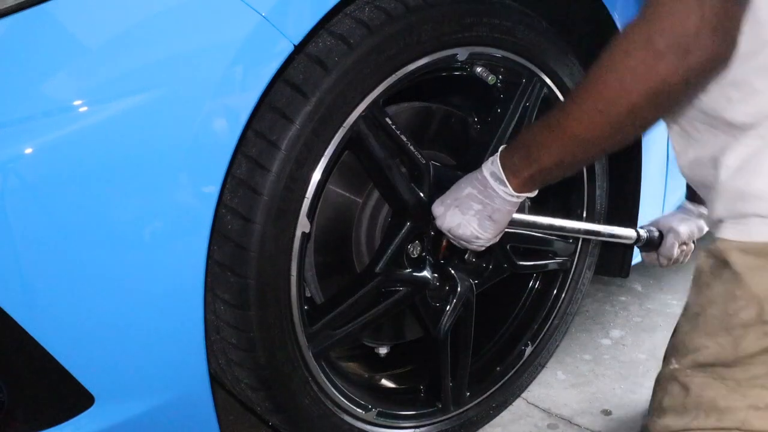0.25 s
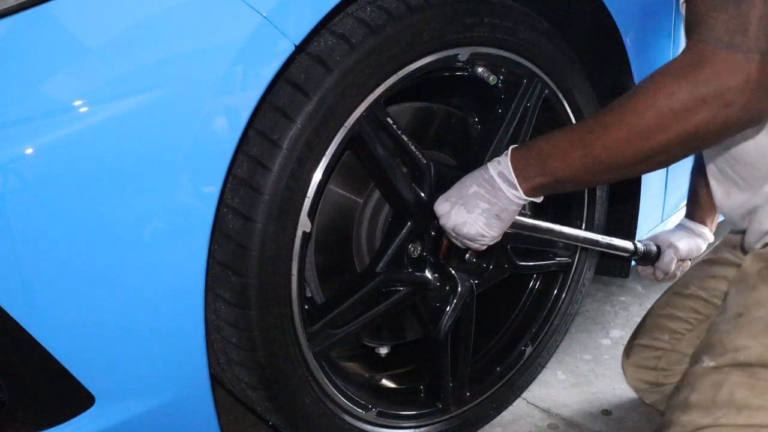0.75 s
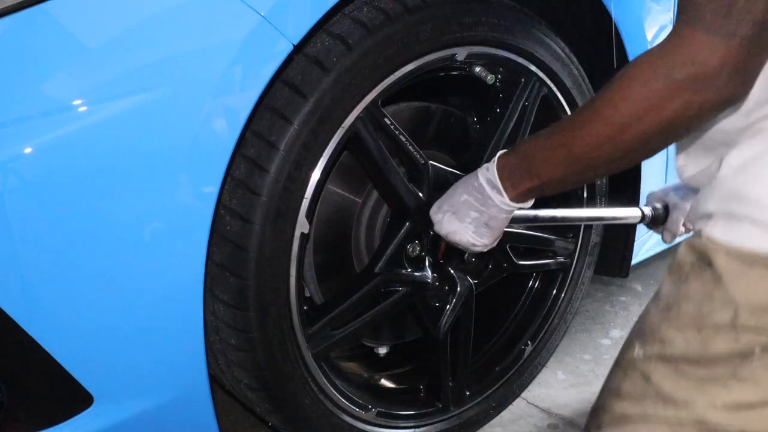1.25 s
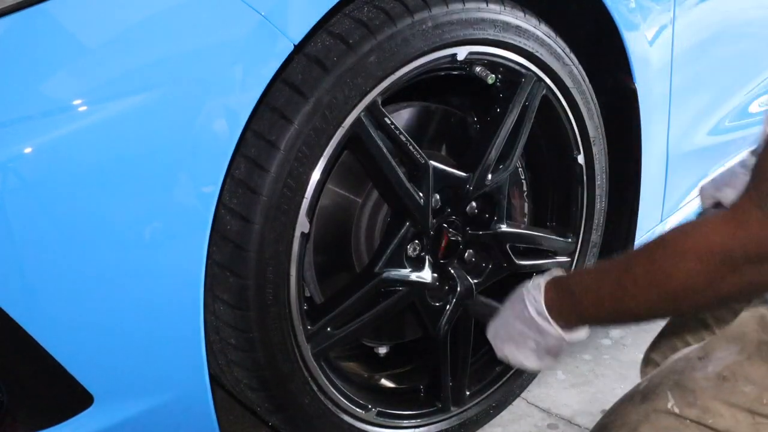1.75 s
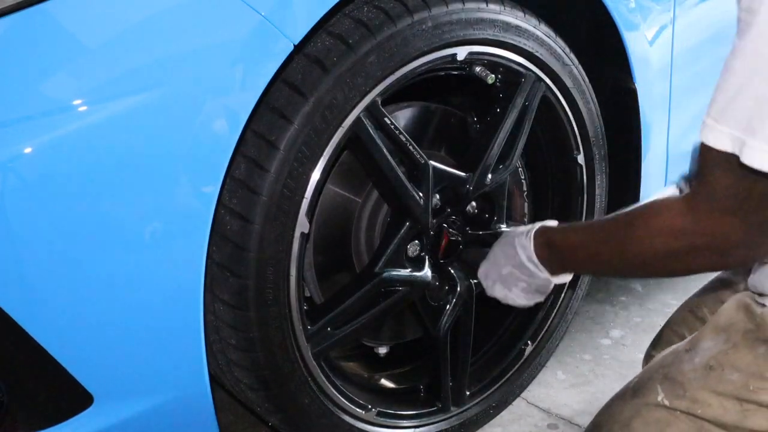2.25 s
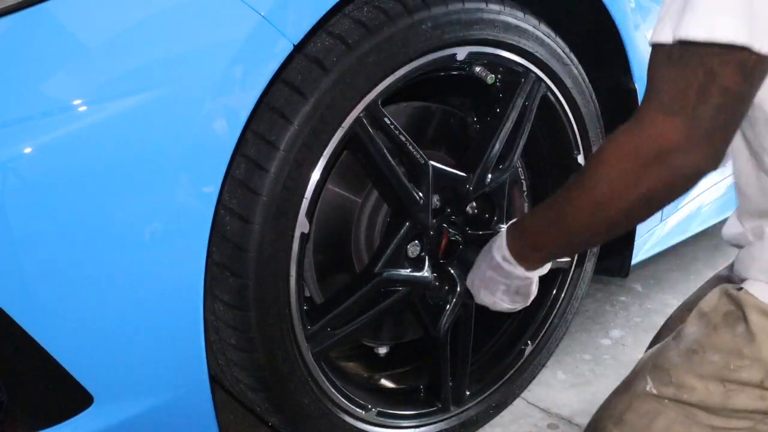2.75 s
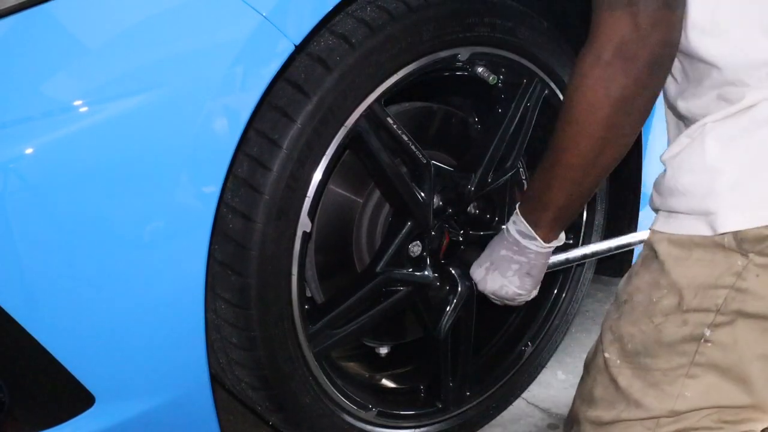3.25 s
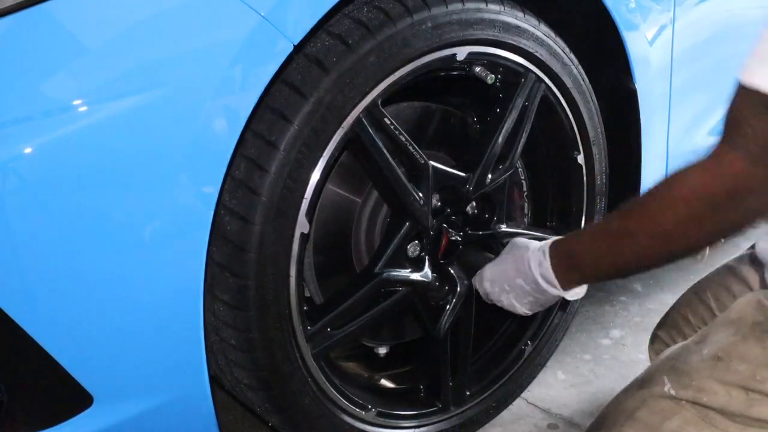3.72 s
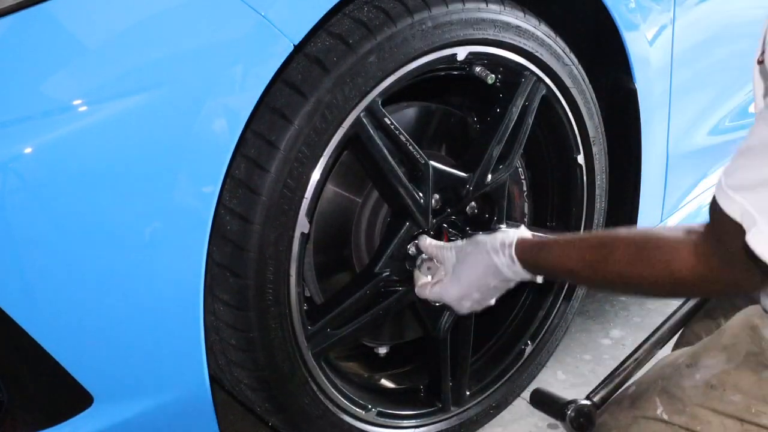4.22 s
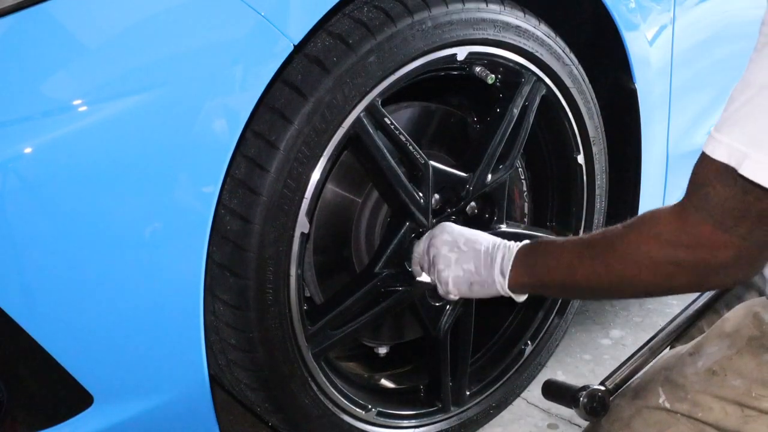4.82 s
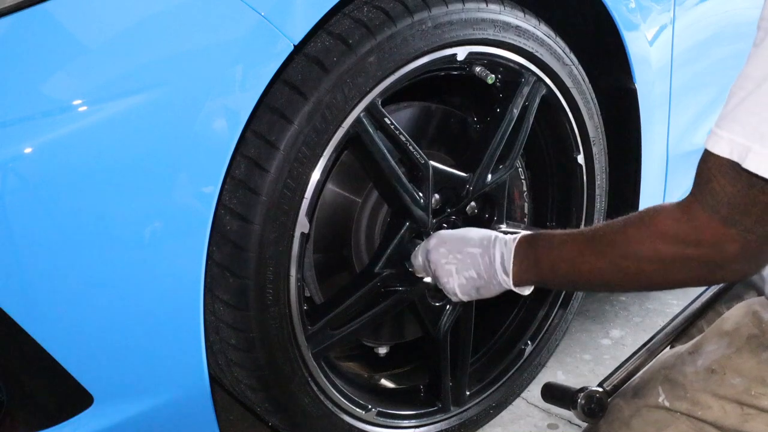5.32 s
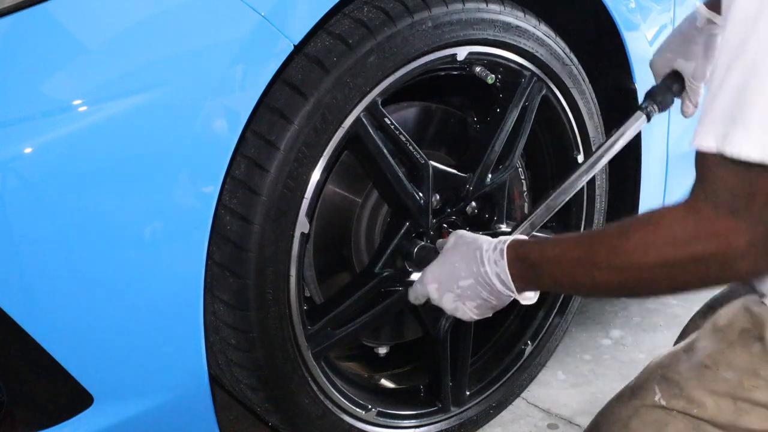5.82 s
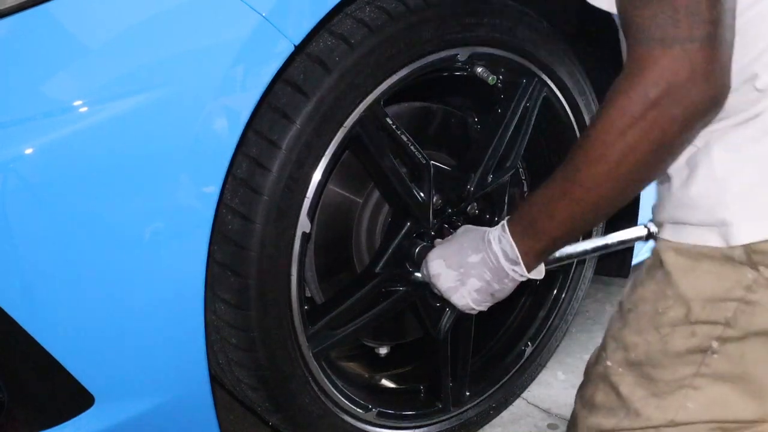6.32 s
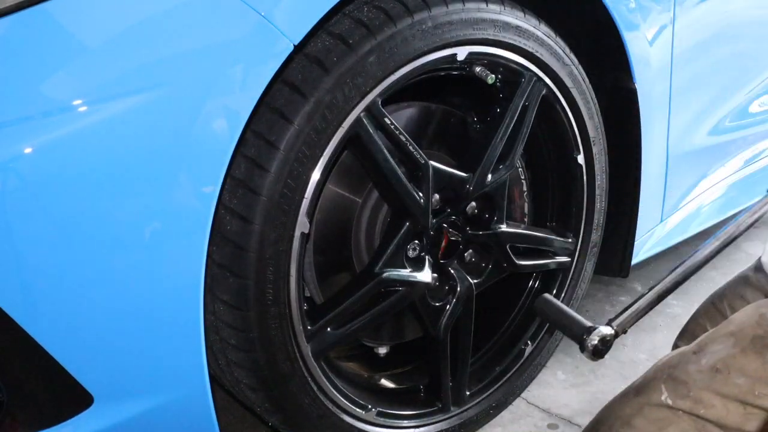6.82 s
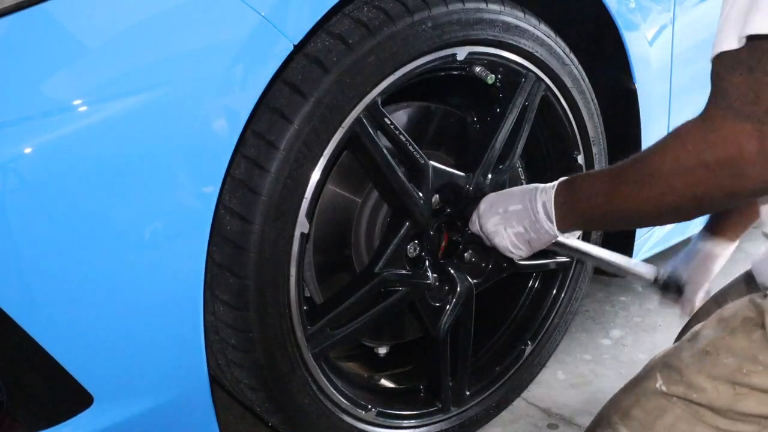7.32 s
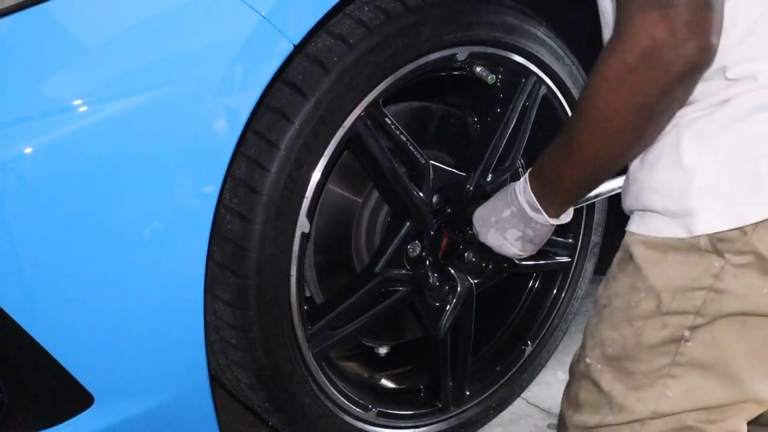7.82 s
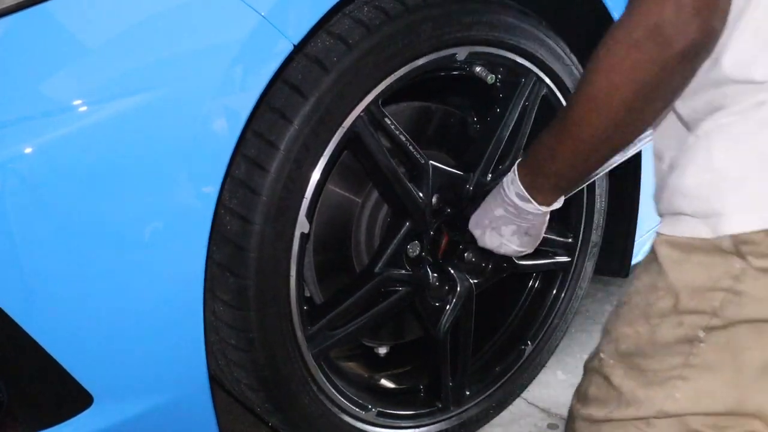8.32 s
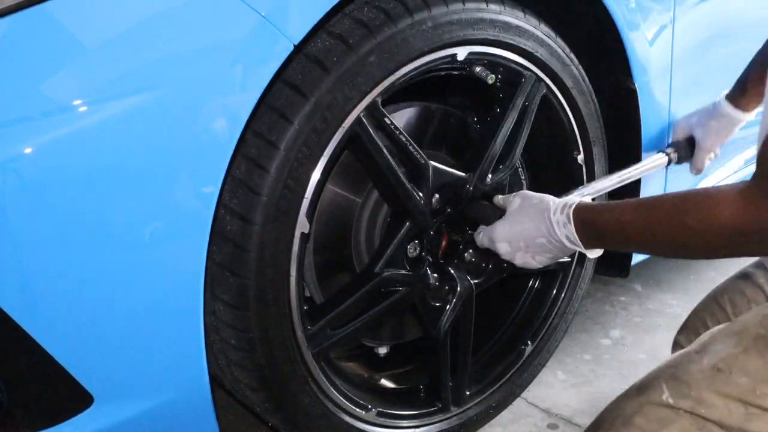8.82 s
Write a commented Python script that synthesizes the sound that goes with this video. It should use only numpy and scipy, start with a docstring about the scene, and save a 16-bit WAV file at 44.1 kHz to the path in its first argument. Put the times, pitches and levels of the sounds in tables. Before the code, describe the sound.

A torque wrench gives two loud metallic clicks in a garage, followed by socket clatter, short ratchet ticks and lighter clicks.

```python
"""Tightening wheel nuts

A click-type torque wrench tightens the lug nuts of a car wheel in a garage. It gives way with a sharp
click and snaps back with a second one. In between, the ratchet ticks, the socket clatters from nut to
nut, gloves rub and knees bump. A limiter holds down the two loudest clicks, so their echo hangs on."""
import sys
import numpy as np
from scipy import signal
from scipy.fft import rfft, irfft
from scipy.io import wavfile
from scipy.ndimage import uniform_filter1d, minimum_filter1d

SR = 44100
rng = np.random.default_rng(int(sys.argv[2]) if len(sys.argv) > 2 else 0)


def unload_audio(sound):
    """Save the sound as a 16-bit wav file, at the path given as the first command line argument."""
    columns = np.transpose(np.atleast_2d(sound))
    # keep every value between -1 and 1, then stretch to whole-number steps
    steps = np.round(np.clip(columns, -1, 1) * 32767)
    wavfile.write(sys.argv[1], SR, steps.astype(np.int16))


N = 399546
SIZE = 2 ** 15   # samples in one short sound
AGE, HZ = np.arange(SIZE) / SR, np.fft.rfftfreq(SIZE, 1 / SR)
LEAD_S = 0.08   # time for a sound to build up before its hit
CRACK_FADE_S = 0.02   # every fade_s is the time to fall by 60 dB


def from_db(db):
    """Turn decibels into a gain."""
    return 10 ** (np.asarray(db) / 20)


def decay(age, fade_s):
    """Fall by 60 dB in fade_s seconds."""
    return np.exp(-np.log(1000) * age / max(fade_s, 1e-3))


def swell(age, rise_s, hold_s, fade_s):
    """Build up until age 0, hold, then die away."""
    return decay(np.maximum(-age, 0), rise_s) * decay(np.maximum(age - hold_s, 0), fade_s)


def tone(points, hz=HZ):
    """Join (pitch_hz, level_db) points into a tone curve in dB."""
    pitch_hz, level_db = np.transpose(points)
    return np.interp(np.log(hz + 1), np.log(pitch_hz), level_db)


def resonances(peaks):
    """Peaks in dB where a part rings; narrow ones are limited in height, so they do not whistle."""
    return sum(min(boost_db, 4 + width_hz / 14) / (1 + (2 * (HZ - hz) / max(width_hz, 40)) ** 2)
               for hz, width_hz, boost_db in peaks)


def weak_resonances(spread_db):
    """Each touch stirs its own mix of the steel's many weak resonances, in dB."""
    grid_hz = np.arange(0, SR / 2, 40)
    return spread_db * np.interp(HZ, grid_hz, rng.standard_normal(len(grid_hz)))


def body(curve_db):
    """Turn a tone curve into a filter of standard power that rings only after a hit (minimum phase)."""
    cepstrum = irfft(curve_db * np.log(10) / 20)
    cepstrum[1:SIZE // 2] *= 2
    cepstrum[SIZE // 2 + 1:] = 0
    response = np.exp(rfft(cepstrum))
    return response / np.sqrt(np.mean(abs(response) ** 2 * (HZ < 12000)))


def direct(force, response, left_db=-1.3, left_lag_s=0.000032):
    """Sound straight from the wheel, a little to the listener's right."""
    spectrum = rfft(force) * response
    left = spectrum * from_db(left_db) * np.exp(-2j * np.pi * HZ * left_lag_s)
    right = spectrum * from_db(-left_db)
    return irfft(np.array([left, right]))


def diffuse(envelope, response, hz=HZ):
    """Reflections from all sides: left and right are alike in the bass, unrelated in the treble."""
    mid, side = rfft(rng.standard_normal((2, len(envelope))) * envelope) * response
    alike = 0.97 * np.sinc(hz * 0.00043)
    mid, side = mid * np.sqrt((1 + alike) / 2), side * np.sqrt((1 - alike) / 2)
    return irfft(np.array([mid + side, mid - side]), len(envelope))


def contacts(envelope, uneven_db):
    """Many tiny hits of uneven strength that together carry the envelope's energy."""
    grip = np.interp(np.arange(SIZE), np.arange(0, SIZE, 64), rng.standard_normal(SIZE // 64))
    force = rng.standard_normal(SIZE) * from_db(uneven_db * grip) * envelope
    return force * np.sqrt(np.sum(envelope ** 2) / np.sum(force ** 2))


def chatter(crack, rattle, curve_db, uneven_db, room_db):
    """Loose steel parts: a dry crack and an uneven rattle that spreads into the garage."""
    response = body(curve_db + weak_resonances(spread_db=3.0))
    room_gain = from_db(room_db)
    dry_share = 1 / np.sqrt(1 + room_gain ** 2)
    force = contacts(crack, uneven_db=0) + dry_share * contacts(rattle, uneven_db)
    return direct(force, response) + room_gain * dry_share * diffuse(rattle, response)


def add(out, start_s, sound):
    """Mix in a short stereo sound and fade out its end."""
    start = max(round(start_s * SR), 0)
    fade = np.minimum((AGE[-1] - AGE) / 0.1, 1) ** 2
    out[:, start:start + SIZE] += (sound * fade)[:, :N - start]


# how loud the garage is: time_s, rumble_db, hiss_db
AIR_LEVELS = [(0, -54, -46.5), (0.699, -53.5, -50.5), (2.051, -53.5, -51.5), (2.55, -60.5, -58.5),
              (9.06, -62.5, -57.5)]
# tone of the rumble and of the hiss: pitch_hz, level_db
RUMBLE_TONE = [(12, -40), (20, -16.5), (75, 5), (124, 8), (151, 3.5), (263, 2.5), (386, -31), (464, -3.5),
               (506, -28), (600, -19.5), (780, -49.5), (1320, -120)]
HISS_TONE = [(180, -13), (300, -2.5), (510, -4.5), (937, -5), (1030, -5), (1280, -5.5), (2180, -7.5),
             (6700, -19.5), (10900, -29.5), (11900, -37), (12500, -68.5), (16200, -97), (22000, -120)]
def garage_air():
    """Rumble and hiss come from all around and sink after the first nut."""
    out, hz = np.zeros((2, N)), np.fft.rfftfreq(N, 1 / SR)
    time_s, rumble_db, hiss_db = np.transpose(AIR_LEVELS)
    for points, level_db in (RUMBLE_TONE, rumble_db), (HISS_TONE, hiss_db):
        noise = diffuse(np.ones(N), from_db(tone(points, hz)), hz)
        gain = from_db(np.interp(np.arange(N) / SR, time_s, level_db))
        out += gain * noise / noise.std()
    return out


# strokes of gloves and clothes: middle_s, length_s, level_db, pitch_hz
CLOTH_STROKES = [(.03, 0.092, -59, 950), (0.191, 0.04, -51, 1600), (.25, .025, -53, 1300),
                 (0.469, 0.072, -56.5, 3960), (0.565, 0.034, -49.5, 1500), (1.31, 0.063, -44, 2445),
                 (1.404, 0.054, -52, 2010), (1.456, .006, -39, 1500), (1.473, 0.014, -40.5, 1750),
                 (1.515, 0.013, -44.5, 1910), (1.52, 0.051, -44.5, 1350), (1.792, 0.086, -56.5, 4630),
                 (1.916, .1, -53.5, 1100), (1.942, 0.016, -53, 1700), (3.902, 0.028, -53, 2000),
                 (4.707, 0.029, -60, 2100)]
# tone of the cloth: pitch_hz, level_db
CLOTH_TONE = [(200, -2.5), (700, -3), (1900, -2.5), (3200, -7), (5000, -13), (8000, -19.5), (12000, -20)]
def cloth_rubs():
    """Cloth slides over the tool: a grainy scuff that swells and fades."""
    out = np.zeros((2, N))
    for middle_s, length_s, level_db, pitch_hz in CLOTH_STROKES:
        cloth = body(tone(CLOTH_TONE) + resonances([(pitch_hz, 0.7 * pitch_hz, 7)]))
        stroke = from_db(level_db) * np.exp(-2 * (AGE / length_s - 2) ** 2)
        scuff = direct(contacts(stroke, uneven_db=4), cloth)
        room = from_db(-2.5) * diffuse(stroke, cloth)
        add(out, middle_s - 2 * length_s, scuff + room)
    return out


# bumps of knees and shoes: start_s, level_db, fade_s, pitch_hz
BUMPS = [(0.046, -44, 0.097, 234), (0.047, -43.5, 0.12, 670), (2.149, -41, 0.06, 387),
         (2.228, -60, 0.35, 217), (2.384, -51, 0.094, 265), (2.931, -47, 0.038, 255),
         (5.753, -50.5, 0.041, 185), (6.487, -51, 0.12, 174), (7.183, -48.5, 0.055, 158),
         (8.399, -48.5, 0.08, 203)]
def soft_bumps():
    """A knee or shoe lands softly: a short, low thud with a dull scuff around it."""
    out = np.zeros((2, N))
    for start_s, level_db, fade_s, pitch_hz in BUMPS:
        dull_db = -10 * np.log10(1 + (3.4 * ((HZ + 1) / pitch_hz - pitch_hz / (HZ + 1))) ** 2)
        envelope = decay(AGE, fade_s) * (1 - decay(AGE, 0.017))
        thud = envelope * np.sin(2 * np.pi * pitch_hz * AGE)
        scuff = from_db(8.5) * diffuse(envelope, body(dull_db))
        add(out, start_s, from_db(level_db) * (thud + scuff))
    return out


# tone of the ratchet, with the highest treble cut away above about 12 kHz: pitch_hz, level_db
RATCHET_TONE = [(60.0, -8), (200.0, -16), (450.0, -4), (1200.0, -5), (2200.0, 9.5), (4200.0, 7.5),
                (6000.0, 2.5), (9000.0, -3), (11600.0, -10.5), (12600, -30)]
# where the ratchet's head rings: pitch_hz, width_hz, boost_db
HEAD_PEAKS = [(920, 100, 14), (1236.0, 110, 5.2), (1455, 400, 11), (1680, 130, 1.9), (2670, 51, 2.8),
              (3820, 260, 3.3), (4800, 61, 3.4), (5000, 380, 0.56), (5900, 380, 7.9), (6840, 300, 4.8),
              (7400, 190, 5.8), (11300, 2500, 7.6)]
# notes of the pawl, the little catch that rides on the teeth: pitch_hz, level_db
PAWL_NOTES = [(3400, -5), (5260, 2), (6450, -5), (10600, -7)]
# back swings of the handle: start_s, length_s, teeth_per_s, tick_db, rattle_db, drop_db, bright_db
HANDLE_SWINGS = [(1.324, 0.032, 9.1, -39.5, -45, 5, -3), (2.385, 0.06, 33, -47.5, -54.5, 3, -5),
                 (2.431, 0.062, 33.7, -42.5, -55, -4, 5), (2.794, 0.059, 140, -46, -40, 4.5, -2),
                 (5.809, 0.056, 20, -42, -61, -6.5, -2), (6.1067, 0.034, 30, -32, -33, 9, -2),
                 (6.162, 0.023, 140, -56, -46.5, 7, -3), (7.4, 0.026, 60, -57, -50, -0.5, 5),
                 (7.424, 0.024, 80, -52, -44.5, 1, 5), (7.723, 0.0038, 8, -52, -44, 3, -12),
                 (7.759, 0.04, 57, -40.5, -45, 5, 3), (8.341, 0.035, 35, -42, -50.5, -4.5, 3.5)]
def ratchet():
    """The pawl ticks and pings over the teeth at an even rate, and the head rattles along."""
    out, age = np.zeros((2, N)), AGE - LEAD_S
    tone_db = tone(RATCHET_TONE) + resonances(HEAD_PEAKS)
    for start_s, length_s, teeth_per_s, tick_db, rattle_db, drop_db, bright_db in HANDLE_SWINGS:
        hardness_db = tone([(1500, 0), (6000, bright_db)])
        drop = from_db(-drop_db * np.clip(age / length_s, 0, 1))
        tooth_age = np.maximum(age - np.arange(0, length_s, 1 / teeth_per_s)[:, None], 0)
        teeth = from_db(tick_db) * drop * (tooth_age > 0)
        ticks = from_db(-2) * np.sum(teeth * decay(tooth_age, CRACK_FADE_S), axis=0)
        detune = 1 + 0.02 * rng.standard_normal((len(tooth_age), 1))
        pawl = sum(from_db(db) * np.sin(2 * np.pi * hz * detune * tooth_age) for hz, db in PAWL_NOTES)
        pings = np.sum(teeth * decay(tooth_age, fade_s=0.026) * pawl, axis=0)
        rattle = from_db(rattle_db) * drop * swell(age, rise_s=0.016, hold_s=length_s, fade_s=0.083)
        head = chatter(ticks, rattle, tone_db + hardness_db, uneven_db=7.0, room_db=-2.5)
        add(out, start_s - LEAD_S, head + direct(pings, from_db(-1)))
    return out


# where the loose socket rings: pitch_hz, width_hz, level_db
CLINK_PEAKS = [(3800, 380, -4), (4000, 260, -3), (4220, 260, 0)]
# clinks of the socket held in the hand: start_s, length_s, level_db
LOOSE_CLINKS = [(4.274, 0.007, -30), (4.302, .002, -33), (4.308, 0.015, -28.5), (4.4, .005, -31.5),
                (4.419, 0.0068, -38), (4.46, 0.01, -47), (4.829, .008, -38), (5.243, 0.011, -48),
                (5.592, .005, -46)]
def socket_clinks():
    """The loose socket buzzes against the nut for a moment, with a high ring that dies quickly."""
    out, age = np.zeros((2, N)), AGE - LEAD_S
    peaks = sum(from_db(db) / (1 + (2 * (HZ - hz) / width_hz) ** 2) for hz, width_hz, db in CLINK_PEAKS)
    cup = body(20 * np.log10(peaks + 1e-4))
    for start_s, length_s, level_db in LOOSE_CLINKS:
        buzz = from_db(level_db) * swell(age, rise_s=0.0053, hold_s=length_s, fade_s=0.024)
        room = from_db(level_db - 13) * swell(age, rise_s=0.011, hold_s=length_s, fade_s=0.17)
        add(out, start_s - LEAD_S, direct(contacts(buzz, uneven_db=0.5), cup) + diffuse(room, cup))
    return out


# tone of the knocks, with the highest treble cut away above about 12 kHz: pitch_hz, level_db
KNOCK_TONE = [(60, -18), (200, -12), (450, -8), (800, -5), (1100, -4), (1500, -1), (2200, 0), (4200, -4.5),
              (6000, -8), (9000, -15.5), (11600, -17.5), (12600, -36)]
# ringing shared by all knocks: pitch_hz, width_hz, boost_db
SOCKET_PEAKS = [(640, 110, 3.4), (950, 130, 3.8), (1290, 380, 4.9), (1863, 50, 3.8), (2570, 410, 4),
                (3760, 210, 3), (3970, 94, 3.8), (4600, 150, 1.7), (5200, 120, 4.8), (6500, 270, 0.88)]
# the socket knocks on nut and wheel: start_s, crack_db, crack_fade_s, rattle_db, slide_s,
# bass_db, bright_db, ring_db, wheel_hz, nut_hz, socket_hz
SOCKET_KNOCKS = [(2.1527, -19, 0.012, -32, 0.047, 4.5, -0.5, 12, 850, 1390, 3000),
                 (2.2259, -12, 0.012, -31, 0.019, 0, -7, 9, 590, 1330, 2210),
                 (2.2437, -25, 0.016, -27, 0.013, 0, 3.5, 6.0, 930, 1940, 2700),
                 (2.254, -33, 0.018, -30, 0.02, 2, -1, 9, 990, 1950, 2590),
                 (2.265, -27.5, 0.018, -33, 0.064, -2, -3.5, 6.0, 990, 1330, 2610),
                 (2.3458, -45, 0.018, -40.5, 0.043, 5, 3, 12, 940, 1720, 2170),
                 (3.7535, -49.5, 0.018, -48.5, 0.037, -14, 0, 3, 1120, 2120, 2210),
                 (3.9188, -21.5, 0.008, -31, 0.021, 1, 4.5, 6.5, 617, 1840, 2400),
                 (4.125, -54, 0.018, -41, 0.076, -4, -12.5, 2, 1010, 1820, 2210),
                 (4.2752, -29.5, 0.024, -26, 0.017, 3, -5.5, 19, 1000, 1420, 4020),
                 (4.311, -42, 0.018, -34, 0.091, -11, -4, -2, 920, 1480, 4050),
                 (4.3955, -19, 0.017, -28.5, 0.012, -1, -3.5, 4, 686, 1340, 4240),
                 (4.422, -45, 0.018, -34.5, 0.024, -7, 0, 3, 900, 1410, 3890),
                 (4.4565, -33, 0.015, -26.5, 0.036, 1.5, 7.5, 10, 990, 1350, 4110),
                 (4.5307, -33, 0.0046, -46, 0.079, -4, 0.5, 9, 680, 1420, 2530),
                 (4.594, -58, 0.018, -49, 0.037, -19, 0, 8, 1030, 1630, 2230),
                 (4.7192, -56, 0.018, -39, 0.11, -8, 4, 12, 940, 2030, 2280),
                 (4.768, -42, 0.018, -34, 0.039, -13, -6, 8.0, 600, 2090, 3700),
                 (4.7825, -34, 0.007, -39, 0.0066, -3, 11, 18, 610, 2090, 3700),
                 (4.789, -43, 0.018, -27.5, 0.029, -16, 7, 9, 650, 2070, 3680),
                 (4.797, -35, 0.0082, -46, 0.01, -10, -7, 11, 660, 1860, 4060),
                 (4.8304, -39, 0.018, -26.5, 0.055, -3, 8, 6, 960, 2130, 4200),
                 (4.9494, -51, 0.016, -40.5, 0.047, 3.5, -1, 9, 1020, 1370, 2560),
                 (5.055, -59, 0.018, -40, 0.025, -6, -9, 4, 590, 1410, 2320),
                 (5.071, -38, 0.007, -44.5, 0.025, -2, -5, 8.0, 580, 1410, 2320),
                 (5.147, -49, 0.018, -51.5, 0.04, 4, -5, 4, 1070, 1380, 2670),
                 (5.2387, -52, 0.018, -28, 0.032, -2, 9, 10, 950, 1380, 4070),
                 (5.2621, -37, 0.018, -28.5, 0.066, -3, 0, 5, 950, 1560, 2210),
                 (5.278, -42, 0.018, -41, 0.02, -1, -4, 12, 930, 1860, 2200),
                 (5.3289, -29, 0.026, -36, 0.023, -9, -3, 15, 570, 1967, 2400),
                 (5.355, -22.5, 0.014, -38.5, 0.052, -5, -2, 13, 570, 1460, 2240),
                 (5.579, -47, 0.018, -36.5, 0.027, 1, -6, 4, 940, 1390, 4080),
                 (5.5903, -22.5, 0.015, -29, 0.026, 9.5, 3, 12.5, 950, 1400, 4030),
                 (5.666, -54, 0.018, -29.5, 0.0099, 6, 20, 7.5, 950, 1370, 2520),
                 (5.676, -39, 0.0077, -31, 0.025, 8, 12, 9, 940, 1390, 2480),
                 (5.6843, -30, 0.009, -44, 0.018, 11, -3, 10, 945, 1380, 2650),
                 (5.723, -35, 0.018, -35.5, 0.012, 0, 8, 6.5, 910, 1440, 2270),
                 (5.738, -30, 0.016, -35.5, 0.062, 1, 6.5, 9.5, 670, 1460, 2300),
                 (6.75, -37.5, 0.016, -43.5, 0.072, -4, -4.5, 11, 676, 1510, 2340),
                 (6.785, -35.5, 0.018, -40.5, 0.066, 0, -0.5, 9, 905, 1930, 2560),
                 (6.8669, -46, 0.011, -26.5, 0.0037, 6, 5.5, 7, 625, 2050, 2270),
                 (6.8764, -32.5, 0.014, -32, 0.017, 3, -10, 6.5, 624, 2140, 2640),
                 (6.9044, -50, 0.007, -33.5, 0.02, 0, 3, 4, 820, 2150, 4190),
                 (6.9139, -39, 0.0087, -35.5, 0.027, 12, 5.5, 9, 835, 2080, 4230),
                 (6.9489, -46, 0.0061, -37, 0.079, 7, 5, 8, 970, 1390, 2420),
                 (7.037, -15.5, 0.0097, -27.5, 0.0076, 7, -2.5, 6, 617, 1290, 2300),
                 (7.08, -35.5, 0.018, -39.5, 0.15, 12, -10, 7.0, 930, 1230, 2450),
                 (7.18, -41.5, 0.024, -40, 0.068, 11, -2, 5, 620, 1280, 2850),
                 (7.214, -46, 0.013, -34, 0.017, 7.5, 3.5, 5.5, 573, 1240, 2970),
                 (7.864, -61, 0.018, -48.5, 0.026, 0, -2, 3, 850, 1580, 2500),
                 (8.952, -29.5, 0.022, -40, 0.086, -2.5, -14.5, 2, 1060, 1430, 2280),
                 (9.0509, -28.5, 0.014, -32.5, 0.0095, 0, 0, 5, 880, 1290, 2290)]
def socket_clatter():
    """The socket slides, hits and rattles; each touch rings wheel, nut and socket in its own way."""
    out, age = np.zeros((2, N)), AGE - LEAD_S
    tone_db = tone(KNOCK_TONE) + resonances(SOCKET_PEAKS)
    for (start_s, crack_db, crack_fade_s, rattle_db, slide_s,
         bass_db, bright_db, ring_db, *ring_hz) in SOCKET_KNOCKS:
        parts = zip(ring_hz, (0.7, 1, 0.75))   # the nut rings most
        peaks_db = resonances([(hz, 70 + 0.055 * hz, share * ring_db) for hz, share in parts])
        # the more the crack stands above the rattle, the more treble
        treble_db = bright_db - 5 + 0.57 * (crack_db - rattle_db)
        hardness_db = tone([(70, bass_db - 9), (250, bass_db), (600, bass_db),
                            (1800, 0), (4000, bright_db), (8000, treble_db)])
        crack = from_db(crack_db) * (age >= 0) * decay(abs(age), crack_fade_s)
        settle_s = 0.088 * 2 ** (-(rattle_db + 30) / 75)   # a firm blow settles sooner
        rattle = from_db(rattle_db) * swell(age, rise_s=slide_s, hold_s=0, fade_s=settle_s)
        knock = chatter(crack, rattle, tone_db + peaks_db + hardness_db, uneven_db=1.5, room_db=0)
        add(out, start_s - LEAD_S, knock)
    return out


# low notes of wheel and tyre: pitch_hz, level_db, fade_s
WHEEL_NOTES = [(278.6, -27, 0.85), (293, -20.5, 0.59), (312, -27, 0.42), (360, -19.5, 0.34)]
def wheel_boom(swell_at_s=0.126, swell_width_s=0.013, swell_hz=289):
    """A click jolts wheel and tyre into a boom, which swells once more shortly after."""
    boom = sum(from_db(db) * np.sin(2 * np.pi * hz * AGE) * decay(AGE, fade_s)
               for hz, db, fade_s in WHEEL_NOTES)
    late_swell = from_db(-17.5) * np.exp(-((AGE - swell_at_s) / swell_width_s) ** 2)
    return boom + late_swell * np.sin(2 * np.pi * swell_hz * AGE)


# notes of the wrench's tube: pitch_hz, level_db
TUBE_NOTES = [(1747, -32), (1915, -25.5), (2162, -21.5), (3157, -24.5), (3497, -26.5), (3696, -24),
              (4056, -21), (4445, -27), (5158, -27.5), (5870, -25), (10643, -25), (11170, -26.5)]
def tube_ring():
    """The steel tube sings on after a click, with a new mix of its notes each time."""
    offsets_db = 5.5 * rng.standard_normal(len(TUBE_NOTES))
    notes = sum(from_db(db + offset_db) * np.sin(2 * np.pi * hz * AGE)
                for (hz, db), offset_db in zip(TUBE_NOTES, offsets_db))
    return decay(AGE, fade_s=0.35) * notes


def lever_slam():
    """The blow of the lever inside the wrench: a very short burst, about equally strong at all pitches."""
    envelope = decay(AGE, CRACK_FADE_S)
    flat_spectrum = np.exp(1j * np.angle(rfft(contacts(envelope, uneven_db=0))))
    force = irfft(flat_spectrum) * decay(AGE, 4 * CRACK_FADE_S)
    return force * np.sqrt(np.sum(envelope ** 2) / np.sum(force ** 2))


# tone of the clicks as the wrench gives way and snaps back: pitch_hz, level_db
GIVE_TONE = [(60, -17.5), (200, -11), (450, -14), (1300, -6), (3000, -3.5), (6500, -10), (9000, -10),
             (11500, -20), (12500, -26.5)]
SNAP_TONE = [(60, -22), (200, -10.5), (450, -15.5), (1300, -12.5), (3000, -9), (6500, -11), (9000, -13),
             (11500, -15.5), (12500, -27)]
# where each kind of click rings: pitch_hz, width_hz, boost_db
GIVE_PEAKS = [(633, 87, 4.5), (973, 110, 8.1), (1690, 210, 4.2), (2305, 99, 5), (2418, 220, 4),
              (2712, 250, 2.9), (3200, 490, 5.5), (3680, 380, 5.5), (4100, 300, 2.6), (4660, 510, 5),
              (5397, 175, 3), (5766, 340, 5.8), (7470, 295, 3), (8140, 510, 5.5), (10030, 330, 4),
              (10600, 600, 22.5), (11270, 530, 28)]
SNAP_PEAKS = [(669, 340, 6.6), (1000, 70, 17), (1650, 370, 4.3), (1940, 1300, 7), (2250, 202, 4),
              (2950, 129, 5), (3320, 880, 4.7), (4030, 387, 4.2), (4418, 240, 4), (5040, 240, 8.2),
              (5650, 490, 8.5), (6450, 700, 5.1), (7360, 700, 3), (9000, 560, 10.5), (10060, 1000, 12.2),
              (10625, 181, 8), (11050, 450, 23)]
# added tone of the bright, lean crack and of the garage's echo: pitch_hz, level_db
CRACK_TONE = [(100, -8.5), (300, 0.5), (1000, -1), (3000, -3.5), (7000, 4), (11500, -4.5)]
ECHO_TONE = [(100, 3), (450, 4), (1500, -4.5), (4000, 0), (8000, 1.5), (11500, -10.5)]
# the wrench gives way, then snaps back:
# start_s, crack_db, tail_db, length_s, nut_low_hz, nut_mid_hz, nut_high_hz
GIVE_CLICKS = [(0.7215, 14.5, -9, 0.56, 2445, 4370, 4770), (3.563, -36, -36, 0.1, 2320, 3620, 6050),
               (3.582, -20, -38.5, 0.087, 3550, 4700, 8550),
               (6.4237, -34.5, -34.5, 0.081, 2220, 5050, 6650),
               (6.4425, -22.5, -46, 0.054, 2280, 5050, 6650), (8.6153, -23, -31.5, 0.062, 2550, 4680, 7600),
               (8.633, -27.5, -47, .04, 2550, 4680, 7600)]
SNAP_CLICKS = [(1.0477, 8.5, -13, 0.33, 2000, 3440, 4140), (3.630, -34, -35, 0.062, 3620, 4820, 9500),
               (3.6465, -21.5, -46, 0.043, 3700, 4820, 9600), (6.4865, -16, -35, 0.047, 2380, 2700, 5850),
               (8.677, -33, -35.5, 0.055, 3300, 4550, 6200), (8.695, -23.5, -35, 0.03, 3250, 4430, 6050)]
def wrench_clicks(clicks, tone_points, peaks):
    """The lever slams against the tube: a crack and a short ring, then a tail of echo, boom and tube."""
    out, boom = np.zeros((2, N)), wheel_boom()
    tone_db, wrench_db = tone(tone_points), resonances(peaks)
    for start_s, crack_db, tail_db, length_s, *nut_hz in clicks:
        peaks_db = wrench_db + resonances([(hz, 0.095 * hz, 5.5) for hz in nut_hz])
        near = body(tone_db + 0.9 * peaks_db + tone(CRACK_TONE))   # a brief crack shows the peaks less
        steel = body(tone_db + peaks_db)
        far = body(tone_db + peaks_db + tone(ECHO_TONE) + weak_resonances(spread_db=3.2))
        crack = direct(lever_slam(), near)
        # the harder the click, the more the steel rings on
        ring = from_db(-10.2 + 0.13 * crack_db) * diffuse(decay(AGE, fade_s=0.08), near)
        # reflections arrive in uneven bunches
        bunches = from_db(1.8 * np.interp(AGE, AGE[::128], rng.standard_normal(SIZE // 128)))
        echo = diffuse(decay(AGE, fade_s=0.45) * bunches, far)
        tail = echo + boom + direct(tube_ring(), steel)
        ending = 1 / np.sqrt(1 + (AGE / length_s) ** 8)   # the echo of the later clicks stops short
        add(out, start_s, ending * (from_db(crack_db) * (crack + ring) + from_db(tail_db) * tail))
    return out


def scene():
    """Wrench, socket, ratchet and the mechanic's movements over the garage's background."""
    give_way = wrench_clicks(GIVE_CLICKS, GIVE_TONE, GIVE_PEAKS)
    snap_back = wrench_clicks(SNAP_CLICKS, SNAP_TONE, SNAP_PEAKS)
    socket = (socket_clatter() + socket_clinks()) * from_db([[-0.1], [0.1]])   # left, right
    air = garage_air() * from_db([[-0.6], [0.6]])
    return air + ratchet() + soft_bumps() + cloth_rubs() + socket + give_way + snap_back


def limiter(sound, threshold_db, release_db_per_s):
    """The volume drops at once on a loud peak and climbs back steadily."""
    power = uniform_filter1d(np.mean(sound ** 2, axis=0), size=130)
    over_db = np.maximum(10 * np.log10(np.maximum(power, 1e-12)) - threshold_db, 0)
    ahead_db = -minimum_filter1d(-over_db, size=180)   # start just before the peak
    climb_db = release_db_per_s * np.arange(N) / SR
    return sound * from_db(climb_db - np.maximum.accumulate(ahead_db + climb_db))


def record(dry):
    """Hold down the loud clicks, round off their peaks and cut the highest treble."""
    held = limiter(dry, threshold_db=-8.0, release_db_per_s=122.5)
    rounded = held / (1 + (held / 0.85) ** 4) ** 0.25
    treble_cut = signal.cheby2(12, 35, 12700, fs=SR, output="sos")
    return signal.sosfiltfilt(treble_cut, rounded)


dry = scene()
out = record(dry)
unload_audio(out)
```